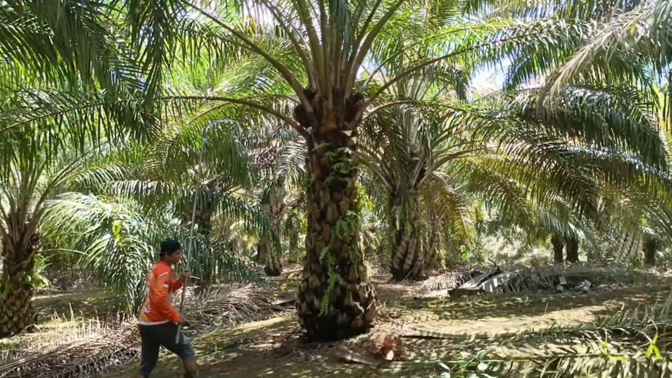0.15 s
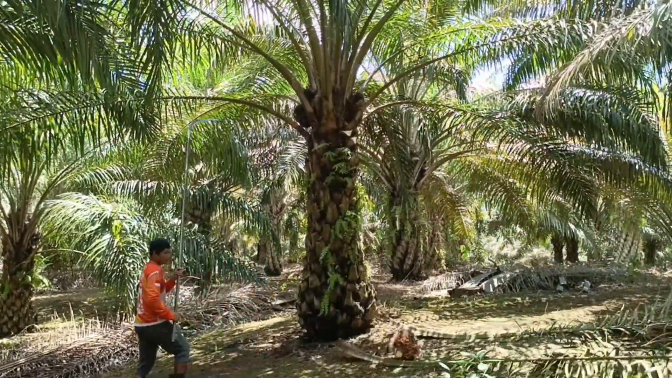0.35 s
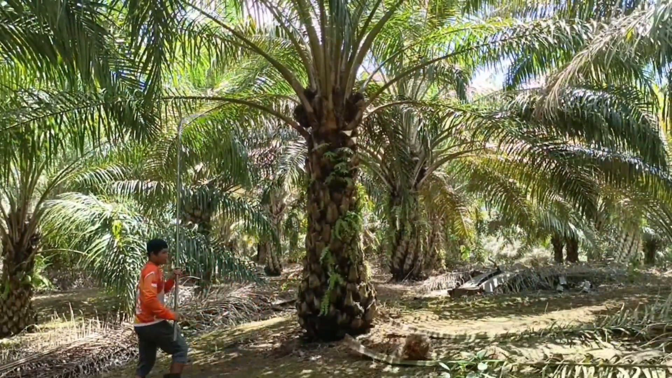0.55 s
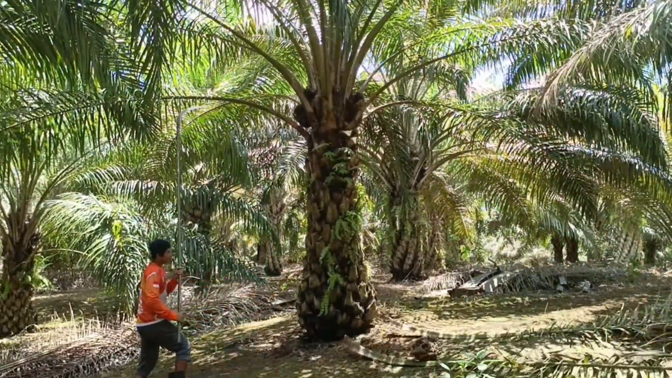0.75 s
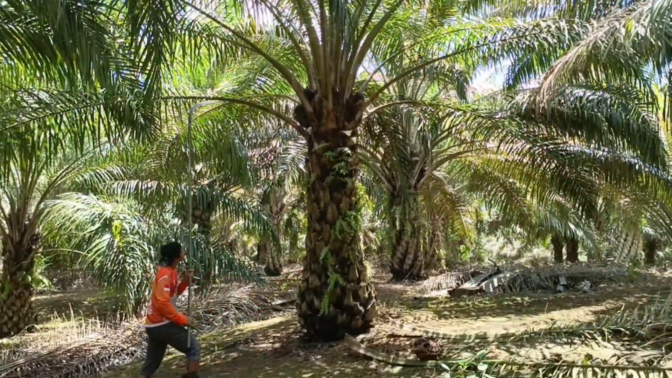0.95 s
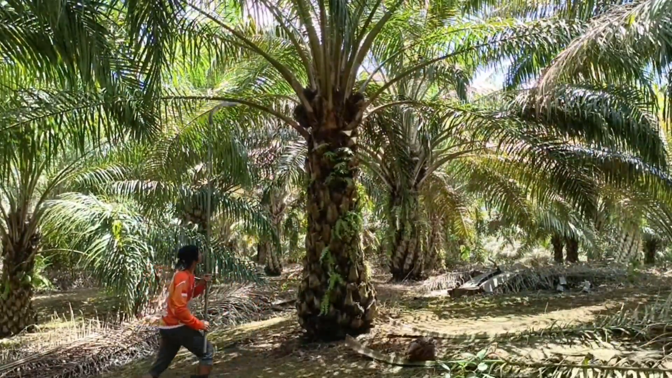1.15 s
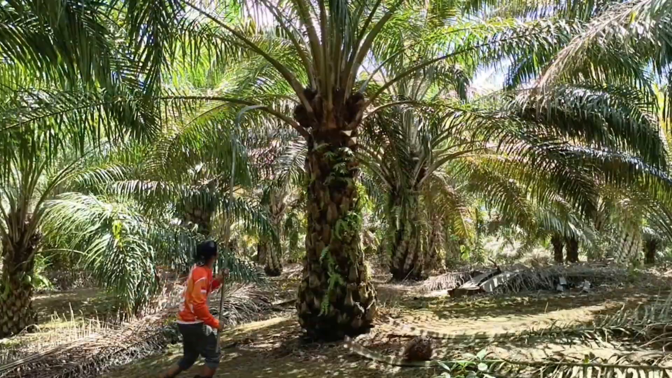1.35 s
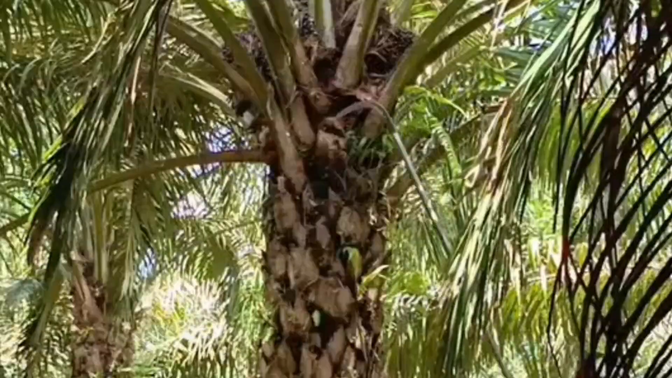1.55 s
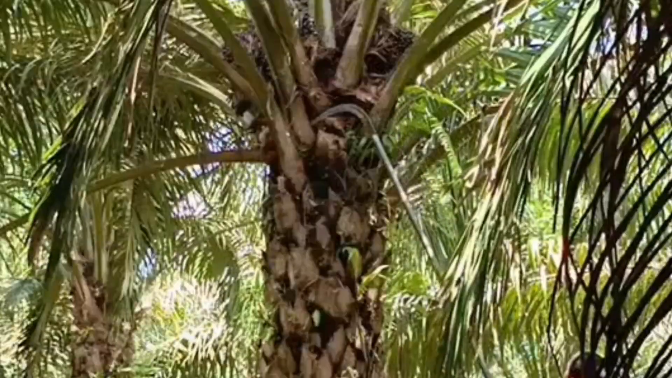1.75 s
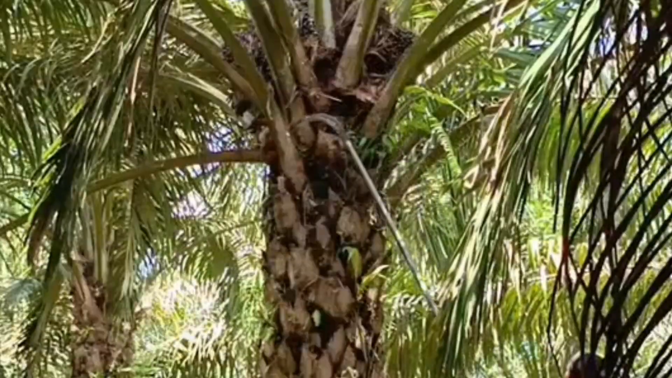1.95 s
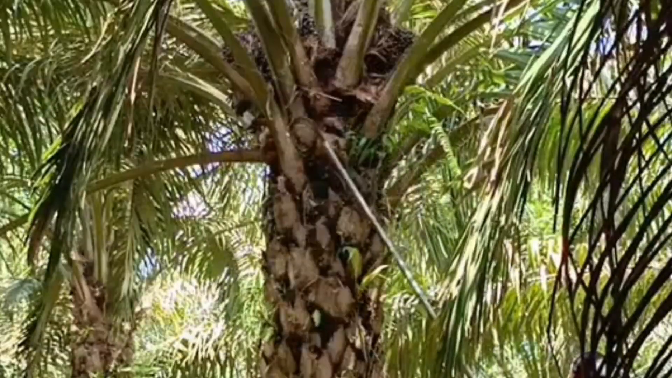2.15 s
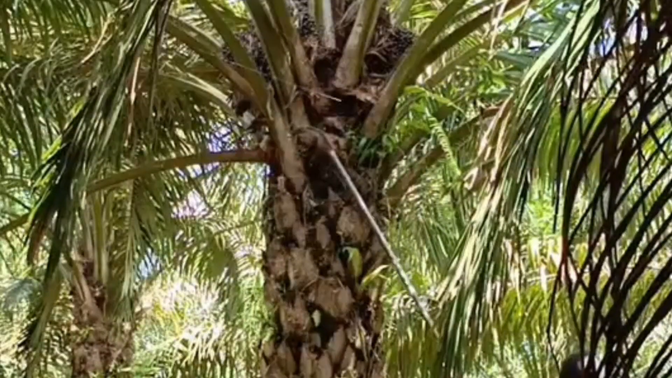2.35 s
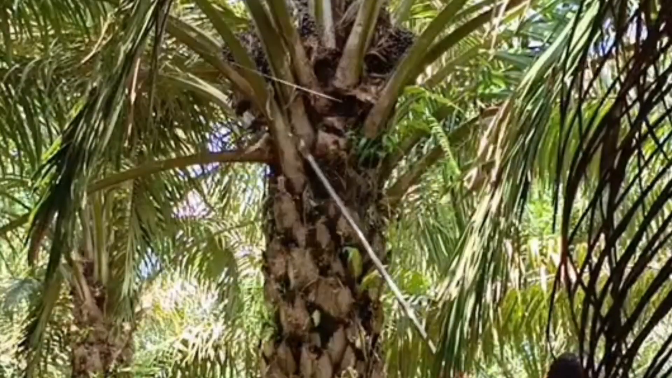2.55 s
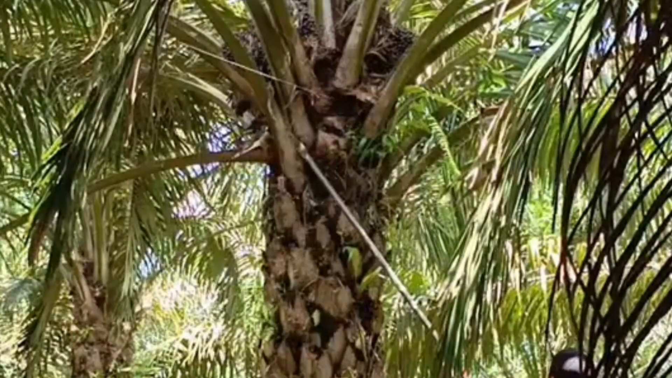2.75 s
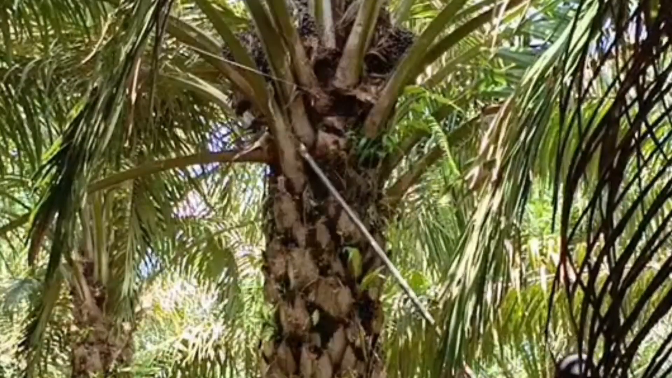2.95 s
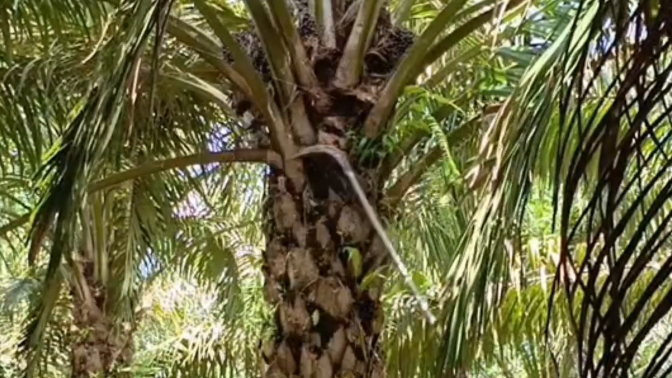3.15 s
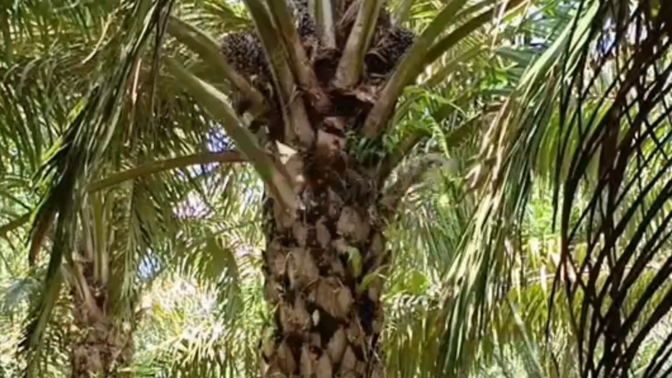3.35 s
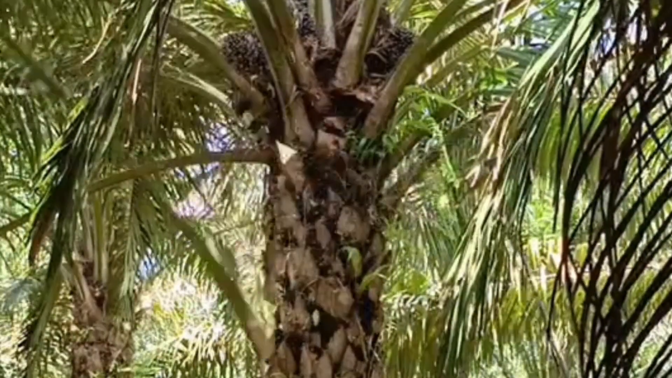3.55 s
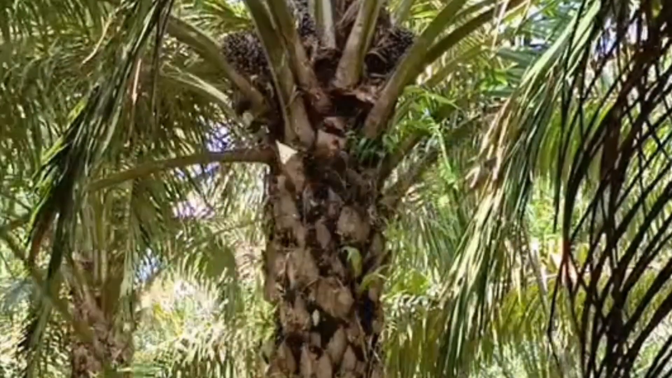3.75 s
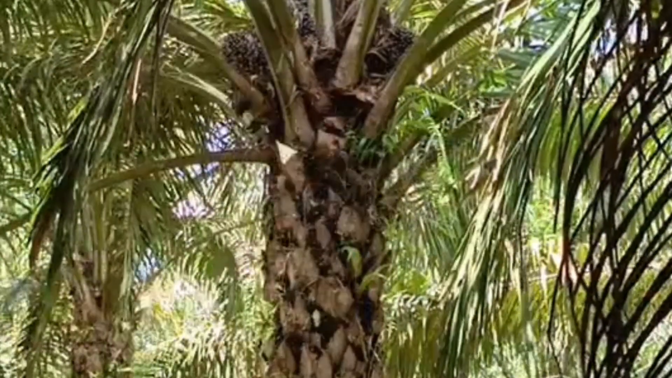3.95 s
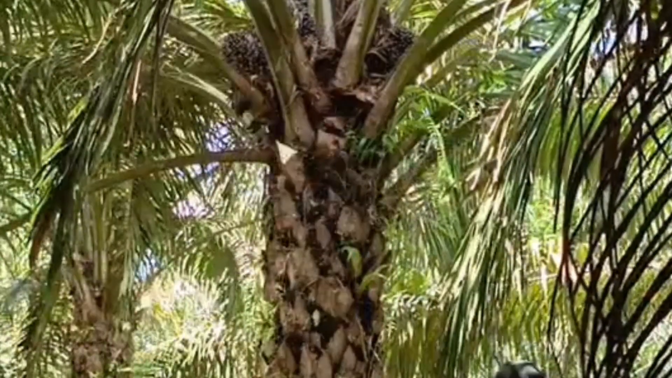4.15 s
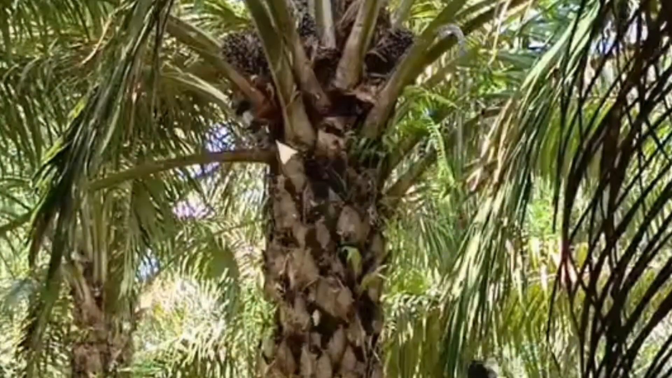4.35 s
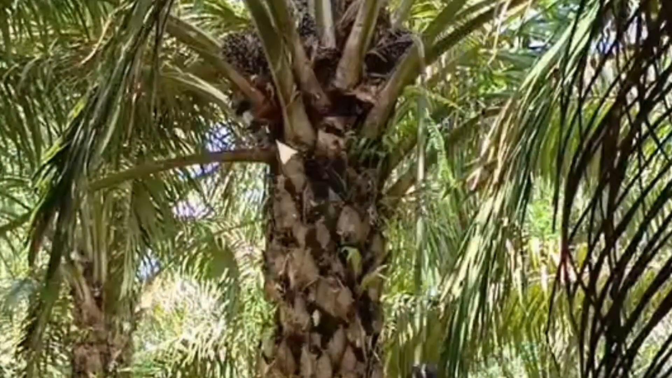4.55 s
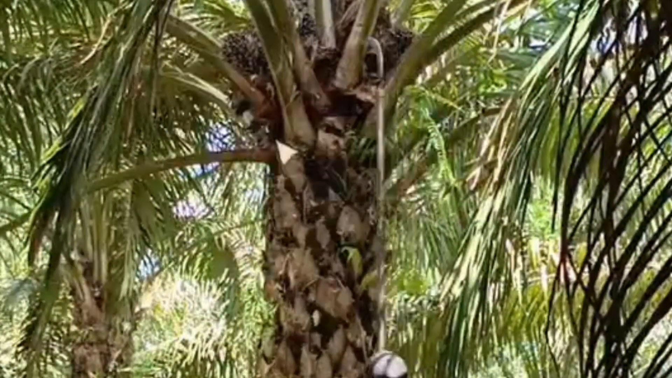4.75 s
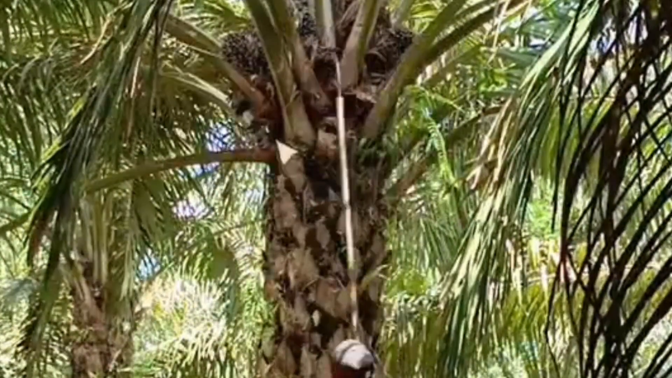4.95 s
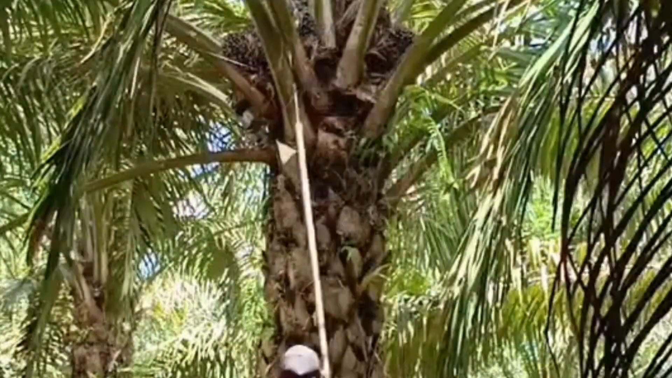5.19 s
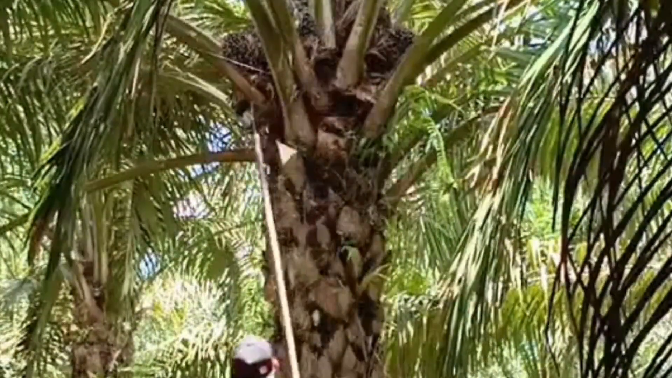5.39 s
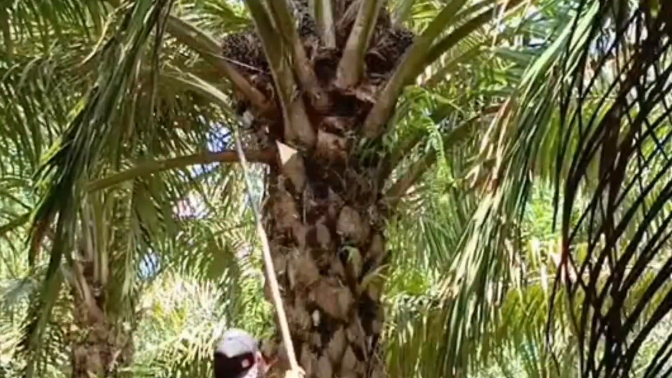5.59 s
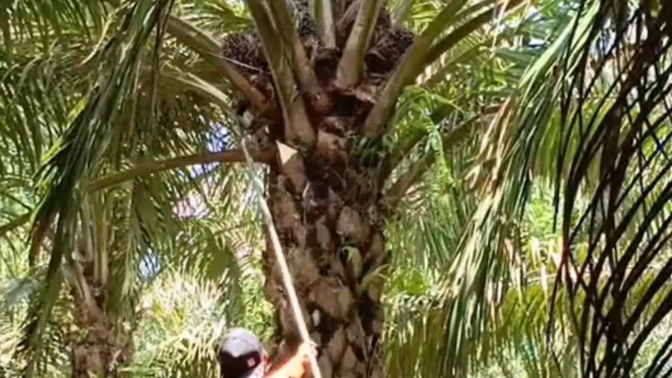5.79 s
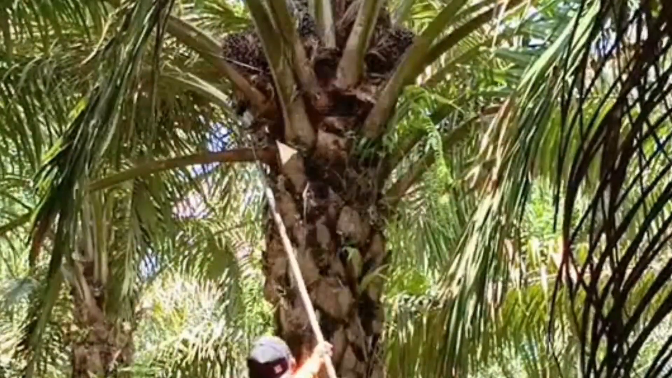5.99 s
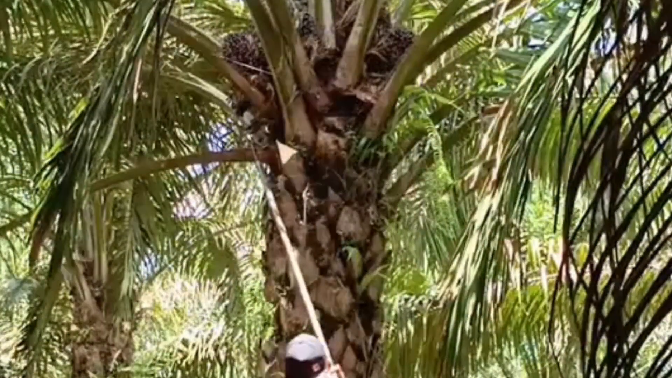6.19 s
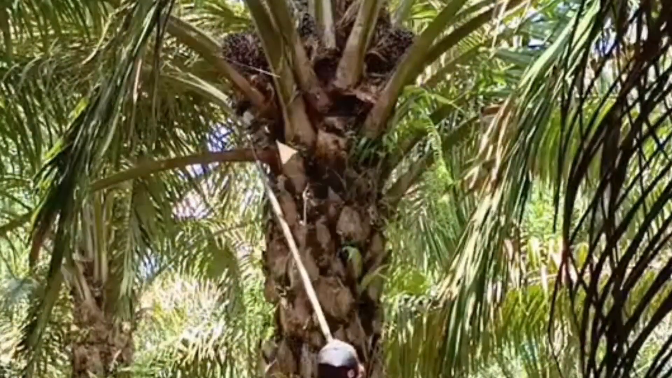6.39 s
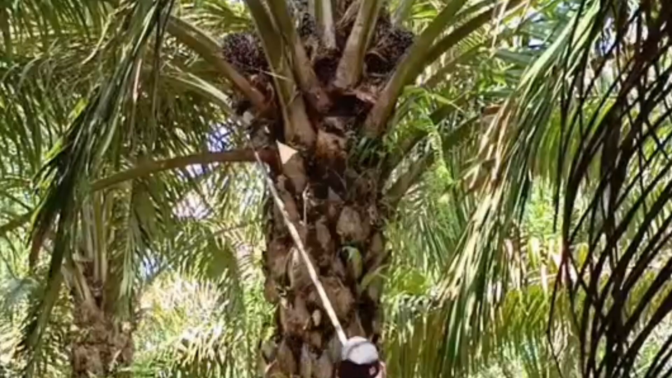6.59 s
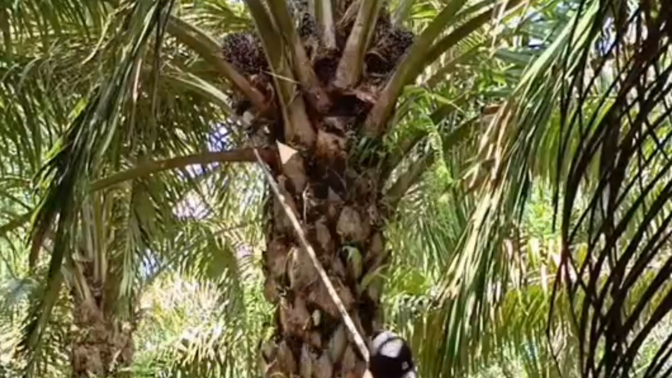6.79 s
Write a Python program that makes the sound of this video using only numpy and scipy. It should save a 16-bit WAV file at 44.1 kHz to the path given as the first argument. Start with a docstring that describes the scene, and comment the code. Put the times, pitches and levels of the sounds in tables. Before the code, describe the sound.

In an insect-filled palm plantation, a blade on a pole knocks, cracks and tears through a stalk, and the frond slides down with leafy swishes and thuds.

```python
"""A sickle on a long pole cuts a frond from an oil palm in a plantation full of insects.
One frond settles on the ground; the pole knocks, the blade bites, squeaks and tears through the next stalk,
and that frond slides down through the leaves and lands in two swishes before the blade is hooked on again.
Leaves and fibres are grains of noise shaped in bands; knocks are dispersed pulses, creaks wavering tones,
thuds narrow noise; insects and air are coloured noise whose level dips briefly."""
import sys
import numpy as np
from scipy import signal
from scipy.fft import rfft, irfft, next_fast_len
from scipy.io import wavfile
from scipy.ndimage import uniform_filter1d

SR = 44100
rng = np.random.default_rng(int(sys.argv[2]) if len(sys.argv) > 2 else 0)


def put_to_file(sound):
    """Save the sound as 16-bit audio at rate SR, in the file named by the first command-line argument."""
    columns = np.atleast_2d(sound).T  # one column per channel
    safe = np.clip(columns, -1, 1)
    whole_steps = np.round(safe * 32767)
    wavfile.write(sys.argv[1], SR, whole_steps.astype(np.int16))


N = 301131
TIME_S = np.arange(N) / SR
FFT_SIZE = next_fast_len(N + SR, True)
FREQ_HZ = np.maximum(np.fft.rfftfreq(FFT_SIZE, 1 / SR), 1)

# relative spectra of leaves, fibres, air hiss, still ground noise, insect chorus: (frequency [Hz], density [dB])
LEAF_COLOUR = [(60, 2.5), (300, -0.5), (900, 0.5), (2000, 0), (4200, 1), (6300, -1.5), (7300, -9),
               (10000, -14.5), (13000, -10), (14000, -7.5), (14800, -2), (15500, -1.5)]
FIBRE_COLOUR = [(60, -2), (160, -8.5), (300, 2.5), (600, -4), (1300, 1), (3000, -3.5), (6200, -6.5),
                (7400, -13.5), (10000, -19.5), (13800, -11), (14700, -12), (15500, -3)]
AIR_COLOUR = [(30, -17), (600, -7.5), (1150, -7), (1450, 7.5), (2200, 1), (3000, -11.5), (6500, -3.5),
              (13500, -4.5), (14600, 6), (15400, 13)]
FLOOR_COLOUR = [(30, -3), (150, 4.5), (500, -2), (1500, -10), (4000, -9), (7000, -15)]
INSECT_COLOUR = [(6400, -47.5), (7100, -14), (7600, -6.5), (7950, -0.5), (8200, -5), (8550, -12),
                 (9200, -28.5), (11000, -39.5)]
# hiss of the plantation air, before dips: (time [s], level [dB])
AIR_LEVEL = [(0, -53), (1.38, -57.5), (1.43, -72), (3.0, -71), (5.9, -60.5), (6.45, -59.5), (6.83, -64)]
# brief dips of the background level, shallower for the hiss: (time [s], depth [dB])
DIPS = [(1.666, 19.5), (2.54, 5), (3.04, 3.5), (6.02, 19), (6.53, 17)]
# chirps of one cricket, before dips: (time [s], level [dB])
CHIRPS = [(1.06, -68), (1.43, -83), (2.45, -79.5), (2.77, -74.5), (5.858, -75.5), (6.148, -75), (6.38, -72)]
# frond settling, sliding through the crown, landing or being brushed:
# (time [s], level [dB], rise [s], fall [s], leaflet hiss relative to level [dB])
SWISHES = [(0.035, -41.5, 0.063, 0.31, -5.5), (.66, -51.5, 0.33, 0.2, -6), (0.811, -53, 0.038, 0.011, -5),
           (1.08, -63.5, .15, .12, 0.5), (3.44, -41.5, 0.28, 0.54, -8), (3.94, -41.5, 0.19, 0.6, -7.5),
           (3.994, -34, 0.043, .19, -5.5), (4.54, -44.5, 0.037, 0.23, -5.5), (4.811, -35.5, .11, 0.21, -5),
           (5.61, -61, 0.05, 0.16, -0.5), (6.36, -70, .12, .07, 5.5)]
# lowest pitch heard at each rustle level: (level [dB], lowest pitch [Hz])
EDGE_BY_LEVEL = [(-68.5, 3850), (-55.5, 1500), (-52.5, 1150), (-48.5, 520), (-46, 258), (-40.5, 205),
                 (-35, 118)]
# stalk fibres and dry leaves cracking:
# (time [s], level at the tilt pivot [dB], fall [s], lowest pitch [Hz], tilt [dB per octave])
CRACKS = [(0.034, -34.5, .015, 150, -3), (.08, -40, .006, 500, -3), (.186, -36, .004, 500, -1),
          (.17, -43, .09, 130, -1.5), (1.584, -65, 0.051, 280, 0), (1.945, -24.5, 0.026, 900, 0),
          (1.987, -39.5, 0.11, 300, 0.6), (2.016, -35, 0.035, 190, -2.5), (2.1, -44, 0.032, 170, -4.5),
          (2.155, -43, 0.043, 250, 1.5), (2.21, -38.5, .04, 140, -2), (2.251, -46, .05, 196, 4.5),
          (2.567, -47, 0.027, 200, -5.5), (2.62, -42, 0.05, 168, -2), (2.635, -65.5, 0.1, 2520, 5.5),
          (2.85, -54, 0.024, 2560, 4.5), (3.096, -41, .015, 233, -2), (3.1205, -24.5, 0.017, 281, -3),
          (3.951, -29, 0.029, 205, -2.5), (4.783, -34.5, 0.022, 300, 4.5), (4.969, -30, 0.0085, 900, -1.5),
          (4.996, -25, 0.013, 200, -.5), (5.015, -34.5, 0.043, 398, 3.5), (5.389, -41, 0.0096, 2200, -1.5),
          (5.579, -55, 0.0089, 1200, 3), (5.723, -56, 0.015, 1998, 1.5), (5.938, -47, 0.023, 1200, 2),
          (6.476, -47.5, .012, 1580, 0.5)]
# resonances of the stalk: (frequency [Hz], width [Hz], boost [dB])
STALK = [(430, 48, 1.5), (1100, 100, -5.5), (1930, 120, 3.5), (2590, 37, 8), (4470, 420, 2.5)]
# tearing in the long pull that severs the stalk: (time [s], level before the pull boost [dB])
PULL = [(3.06, -110), (3.07, -65), (3.128, -31), (3.186, -28), (3.196, -24.5), (3.24, -39)]
# stalks giving way, bumping and meeting the ground: (time [s], level [dB], pitch [Hz], fall [s])
THUDS = [(0.036, -55, 140, 0.09), (.11, -58, 75, .06), (1.584, -62, 410, 0.023), (1.622, -61, 476, 0.0092),
         (1.957, -42.5, 250, 0.012), (3.208, -36, 197, 0.017), (3.932, -42, 112, 0.014),
         (3.959, -44, 247, 0.018), (4.787, -44, 206.4, 0.026), (4.997, -41, 169, 0.016),
         (5.997, -72, 232, 0.014), (6.49, -69, 522, 0.02)]
# jolts of the pole: (time [s], pulse peak before boom and gain [dB], lowest pitch [Hz], highest pitch [Hz])
KNOCKS = [(1.9271, -21.5, 760, 2980), (2.0003, -17, 224, 2660), (2.096, -49, 267, 2030),
          (2.206, -40, 240, 1900), (2.384, -29, 249, 1600), (2.563, -37, 209, 900),
          (2.616, -43.5, 233, 630)]
# ringing modes of the pole: (frequency [Hz], relative level [dB], 60 dB decay [s])
POLE_MODES = [(296, -2, .12), (385, -4, .1), (450, -7, .14), (790, -4, .12), (1147, -7, .1),
              (1250, -7, .15), (1640, -8, .2), (2272, -10, .11), (2622, -10, .15)]
# blade rubbing and creaking in the stalk:
# (time [s], level [dB], pitch [Hz], opening bend [semitones], rise [s], fall [s])
CREAKS = [(2.518, -56, 1640, -1, 0.005, .005), (2.837, -50, 3760, 0, .005, .052),
          (2.847, -40.5, 4500, 6, .006, .009), (2.878, -44.5, 5000, 0, .011, .034),
          (2.845, -49, 5760, 0, .006, .045), (3.2, -21.5, 1079, 0, 0.0067, 0.0045),
          (5.59, -57, 3750, 0, .008, 0.028), (5.937, -49.5, 706.5, 0.5, .004, 0.019),
          (6.291, -62, 3880, 0.5, 0.018, 0.04), (6.476, -58, 2186, 0, .003, .006)]

FLOOR_DB = -85.5
DIP_SINK_S, DIP_RECOVER_S = 0.041, 0.076
CHORUS_FIRST_DB, CHORUS_DB = -63, -60  # before and after CHORUS_STEP_S
CHORUS_STEP_S = 1.42
CHIRP_RISE_S, CHIRP_FALL_S = 0.085, 0.1
HANG_S, BREAK_S = CHORUS_STEP_S, 3.22  # the second frond hangs still between these; then the stalk parts
HISS_FALL_RATIO = 1.15  # fine leaflets fall quiet more slowly than the frond
REST_DB = -77.5  # below this the rustle fades out
CRACK_RISE_SHARE = 0.2  # rise / fall time
PULL_EDGE_HZ, PULL_TILT_DB_PER_OCTAVE, PULL_FALL_S = 320, -.5, 0.037
BOOM_HZ, BOOM_WIDTH_HZ, BOOM_DB = 320, 280, 9  # low, hollow part of every knock
CUTOFF_HZ = 15650


def from_db(db):
    """Decibels to gain."""
    return 10 ** (np.asarray(db) / 20)


def rms_one(x):
    """Scale to unit power."""
    return x / np.sqrt(np.mean(x ** 2) + 1e-20)


def in_time(rows):
    """Interpolate a (time, value) curve at every sample."""
    times_s, values = np.transpose(rows)
    return np.interp(TIME_S, times_s, values)


def colour(points):
    """Gain of a spectrum at every frequency."""
    hz, db = np.transpose(points)
    return from_db(np.interp(np.log(FREQ_HZ), np.log(hz), db))


def resonance_db(hz, width_hz, boost_db):
    """Boost of a resonance at every frequency."""
    return boost_db / (1 + (2 * (FREQ_HZ - hz) / width_hz) ** 2)


def shaped(x, gain):
    """Filter by a frequency response."""
    return irfft(rfft(x, FFT_SIZE) * gain, FFT_SIZE)[:N]


def cut(x, hz, kind, order):
    """Causal Butterworth filter; the tiny offset avoids denormals."""
    return signal.sosfilt(signal.butter(order, hz, kind, fs=SR, output="sos"), x + 1e-18)


def band_pass(x, low_hz, high_hz):
    """Causal band-pass."""
    return cut(x, [low_hz, high_hz], "band", order=3)


def above(x, edge):
    """Gain of a steep fade-out below an edge in frequency or amplitude."""
    return 1 / np.sqrt(1 + (edge / x) ** 8)


def drift(corner_hz):
    """Slow random wander of unit power."""
    return rms_one(shaped(rng.standard_normal(N), 1 / (1 + (FREQ_HZ / corner_hz) ** 2)))


def patches(hz, rate_hz=14):
    """Random wander between normal knots, quicker in high bands; rate_hz holds at 1 kHz."""
    count = int(rate_hz * (hz / 1000) ** .25 * N / SR) + 2
    knots = rng.standard_normal(count)
    return np.interp(TIME_S, np.linspace(0, TIME_S[-1], count), knots)


def swell(time_s, rise_s, fall_s):
    """Sample span and envelope: Gaussian rise to time_s, exponential fall."""
    start = max(int((time_s - 4 * rise_s) * SR), 0)
    end = min(int((time_s + 10 * fall_s) * SR), N)
    span = slice(start, end)
    t = TIME_S[span] - time_s
    return span, np.exp(-(np.minimum(t, 0) / rise_s) ** 2 / 2 - np.maximum(t, 0) / fall_s)


def bursts(rows):
    """Power-summed envelope of bursts (time [s], level [dB], rise [s], fall [s])."""
    power = np.full(N, 1e-18)
    for time_s, level_db, rise_s, fall_s in rows:
        span, envelope = swell(time_s, rise_s, fall_s)
        power[span] += (from_db(level_db) * envelope) ** 2
    return np.sqrt(power)


def bands(x, count=26):
    """Yield (centre Hz, signal) of overlapping third-octave bands that sum to the whole."""
    centres_hz = np.geomspace(45, 15000, count)
    spectrum = rfft(x, FFT_SIZE)
    for hz, share in zip(centres_hz, np.eye(count)):
        yield hz, irfft(spectrum * np.interp(FREQ_HZ, centres_hz, share), FFT_SIZE)[:N]


def grains(per_s, spread_db, blur):
    """Tiny snaps of uneven size over noise that stands for countless smaller ones."""
    sizes = from_db(spread_db * np.minimum(rng.exponential(1, N), 4)) * rng.choice([-1, 1], N)
    snaps = rms_one(sizes * (rng.random(N) < per_s / SR))
    return rms_one(snaps + blur * rng.standard_normal(N))


def grove(x, wet_db, t60_s):
    """Trunks and leaves scatter a short tail, modelled as decaying noise after 4 ms."""
    t = TIME_S[:SR // 2]
    tail = rng.standard_normal(len(t)) * from_db(-60 * t / t60_s) * (t > .004)
    return x + from_db(wet_db) * signal.fftconvolve(x, tail / np.linalg.norm(tail))[:N]


def dips():
    """Background gain: the level sinks quickly and recovers, a few times."""
    loss_db = np.zeros(N)
    for time_s, depth_db in DIPS:
        span, envelope = swell(time_s, DIP_SINK_S, DIP_RECOVER_S)
        loss_db[span] += depth_db * envelope
    return from_db(-loss_db)


def air(dip_share=0.54):
    """A faint hiss of varying level over a steady dull floor, both coloured noise."""
    hiss = rms_one(shaped(rng.standard_normal(N), colour(AIR_COLOUR)))
    floor = rms_one(shaped(rng.standard_normal(N), colour(FLOOR_COLOUR)))
    hiss_gain = from_db(in_time(AIR_LEVEL)) * dips() ** dip_share
    return hiss_gain * hiss + from_db(FLOOR_DB) * floor


def insects(throb_db=.9, cricket_hz=4500, waver_db=2.0):
    """A throbbing high chorus and one thin, wavering cricket note, both from narrow noise."""
    chorus = shaped(rng.standard_normal(N), colour(INSECT_COLOUR))
    chorus = rms_one(chorus * from_db(throb_db * drift(60)))
    cricket = band_pass(rng.standard_normal(N), cricket_hz - 120, cricket_hz + 120)
    cricket = rms_one(cricket * from_db(waver_db * drift(15)))
    chirps = bursts((time_s, db, CHIRP_RISE_S, CHIRP_FALL_S) for time_s, db in CHIRPS)
    chorus_db = np.where(TIME_S < CHORUS_STEP_S, CHORUS_FIRST_DB, CHORUS_DB)
    return from_db(chorus_db) * chorus + chirps * cricket


def rustle(flutter_db=-0.65, patchy_db=1.5, edge_patchy_db=2.8):
    """Leaflets slap and slide over one another as grains of noise; quiet rustle has only highs."""
    slaps = grove(grains(per_s=70, spread_db=2.5, blur=0), wet_db=0, t60_s=.03)
    slides = grains(per_s=1800, spread_db=3.0, blur=1.15)
    source = shaped(slides + .4 * slaps, colour(LEAF_COLOUR))
    source = source / np.std(band_pass(source, 2000, 6500))
    hiss_rms = np.std(band_pass(source, 10000, 15500))

    body = bursts(row[:4] for row in SWISHES)
    hiss = bursts((time_s, db + extra_db, rise_s, fall_s * HISS_FALL_RATIO)
                  for time_s, db, rise_s, fall_s, extra_db in SWISHES)
    tips = hiss / hiss_rms
    audible = above(body, from_db(REST_DB))
    edge_hz = np.interp(20 * np.log10(body), *np.transpose(EDGE_BY_LEVEL))

    out = np.zeros(N)
    for hz, band in bands(source):
        # near its lower edge the rustle is patchier
        spread_db = patchy_db + edge_patchy_db * np.minimum(edge_hz / hz, 1)
        uneven = from_db(spread_db * patches(hz))
        out += band * above(hz, edge_hz) * uneven * (tips if hz > 9000 else body)
    # the second frond hangs still until the pull frees it
    held = uniform_filter1d(1. * (TIME_S > HANG_S) * (TIME_S < BREAK_S), size=900)
    return out * audible * (1 - held) * from_db(flutter_db * drift(13))


def cracks(pivot_hz=2000, pull_boost_db=6.0):
    """Fibres part in quick volleys of snaps, coloured by the woody stalk."""
    snaps = grove(grains(per_s=3500, spread_db=2.0, blur=0.43), wet_db=-6, t60_s=0.091)
    wood = from_db(sum(resonance_db(*row) for row in STALK))
    source = rms_one(shaped(snaps, colour(FIBRE_COLOUR) * wood))

    start_s, end_s = PULL[0][0], PULL[-1][0]
    dying = np.exp(-np.clip(TIME_S - end_s, 0, 1) / PULL_FALL_S)
    pull = from_db(in_time(PULL) + pull_boost_db) * (TIME_S > start_s) * dying

    out = np.zeros(N)
    for hz, band in bands(source):
        octaves = np.log2(hz / pivot_hz)
        power = (pull * from_db(PULL_TILT_DB_PER_OCTAVE * octaves) * above(hz, PULL_EDGE_HZ)) ** 2
        for time_s, db, fall_s, edge_hz, tilt_db in CRACKS:
            span, envelope = swell(time_s, CRACK_RISE_SHARE * fall_s, fall_s)
            power[span] += (envelope * from_db(db + tilt_db * octaves) * above(hz, edge_hz)) ** 2
        out += band * np.sqrt(power)
    return out


def thuds(rise_s=.004, breadth=1.3):
    """Soft soil and wet wood take each blow with a dull, short rumble of narrow noise."""
    out = np.zeros(N)
    for time_s, db, hz, fall_s in THUDS:
        span, envelope = swell(time_s, rise_s, fall_s)
        noise = rng.standard_normal(len(envelope) + SR)
        rumble = rms_one(band_pass(noise, hz / breadth, hz * breadth))
        out[span] += from_db(db) * envelope * rumble[SR:]  # skip the filter's onset
    return out


def knocks(spread=0.109, undelayed_hz=3500, ring_db=-44.0, gain_db=4.0):
    """Each jolt runs down the pole as a bending wave, highs ahead of lows, and leaves the tube ringing."""
    jolts = np.zeros(N)
    for time_s, db, low_hz, high_hz in KNOCKS:
        pulse = cut(signal.unit_impulse(SR // 10), high_hz, "low", order=8)
        pulse = cut(pulse, low_hz, "high", order=5)
        jolts[int(time_s * SR):][:len(pulse)] += from_db(db) * pulse / np.abs(pulse).max()
    # bending-wave speed grows with the root of frequency
    cycles = spread * (2 * np.sqrt(FREQ_HZ) - FREQ_HZ / np.sqrt(undelayed_hz))
    boom = from_db(resonance_db(BOOM_HZ, BOOM_WIDTH_HZ, BOOM_DB))
    wave = shaped(jolts, boom * np.exp(-2j * np.pi * cycles))
    t = TIME_S[:SR // 2]
    modes = sum(from_db(db - 60 * t / t60_s) * np.sin(2 * np.pi * hz * t) for hz, db, t60_s in POLE_MODES)
    ringing = from_db(ring_db) * signal.fftconvolve(wave, modes)[:N]
    return grove(from_db(gain_db) * (wave + ringing), wet_db=-3.5, t60_s=0.093)


def creaks(rough=.03, overtone_db=-21, rasp=.45, bend_s=.01):
    """The blade sticks and slips, bending into a wavering pitch with a rasp around it."""
    out = np.zeros(N)
    for time_s, db, hz, bend_semitones, rise_s, fall_s in CREAKS:
        span, envelope = swell(time_s, rise_s, fall_s)
        waver = drift(300)[span]
        grip = (from_db(2.5 * drift(90)) * (1 + rasp * drift(700)))[span]
        settling = (1 - np.tanh((TIME_S[span] - time_s) / bend_s)) / 2
        pitch_hz = hz * 2 ** (bend_semitones * settling / 12)
        # roughest while the blade presses hardest, then cleaner
        phase = 2 * np.pi * np.cumsum(pitch_hz * (1 + rough * np.cbrt(envelope) * waver)) / SR
        tone = np.sin(phase) + from_db(overtone_db) * np.sin(2 * phase)
        out[span] += from_db(db) * envelope * grip * tone
    return grove(out, wet_db=-5, t60_s=.06)


def scene():
    """Everything reaches one microphone, alike in both channels."""
    background = air() + dips() * insects()
    mono = background + rustle() + cracks() + thuds() + knocks() + creaks()
    return np.array([mono, mono])


def record(dry):
    """The microphone passes neither the deepest rumble nor the very top."""
    low_cut = cut(dry, 32.0, "high", order=2)
    top_cut = signal.ellip(12, .2, 80, CUTOFF_HZ, fs=SR, output="sos")
    return signal.sosfilt(top_cut, low_cut)


dry = scene()
out = record(dry)
put_to_file(out)
```